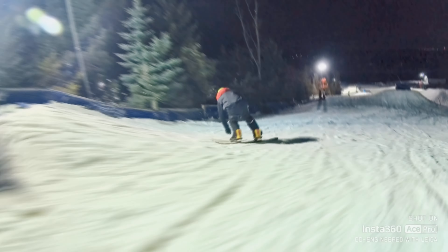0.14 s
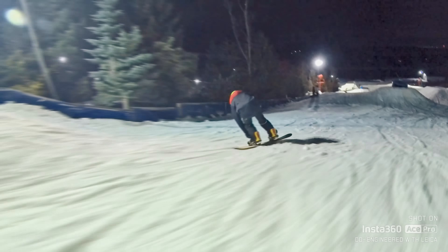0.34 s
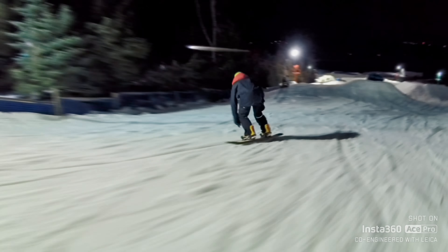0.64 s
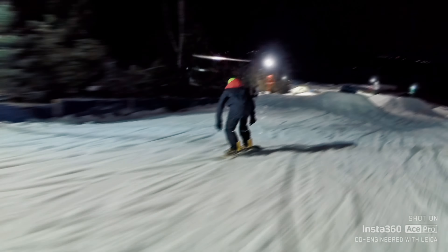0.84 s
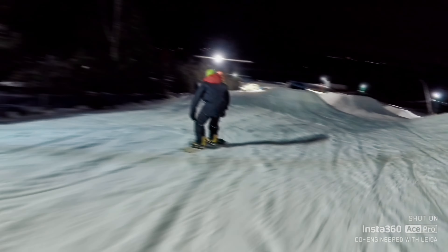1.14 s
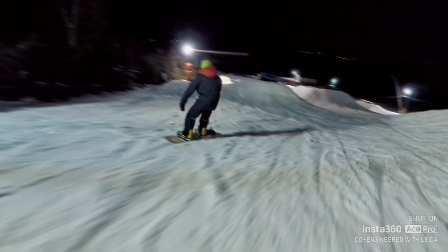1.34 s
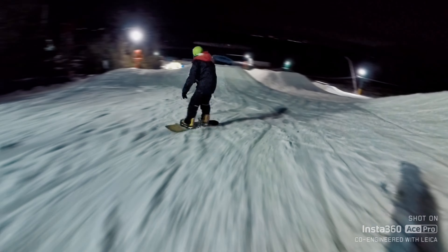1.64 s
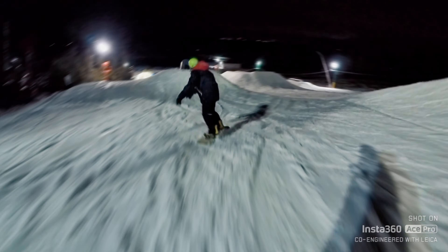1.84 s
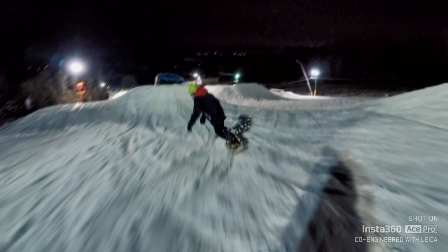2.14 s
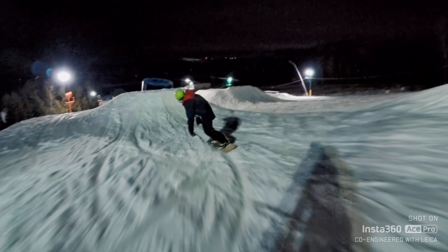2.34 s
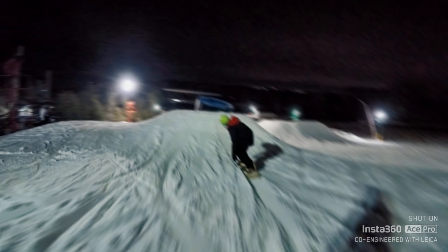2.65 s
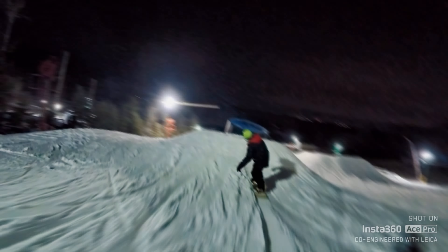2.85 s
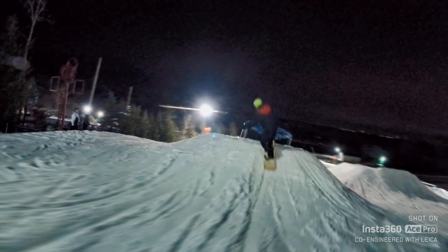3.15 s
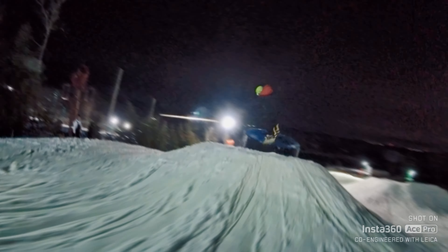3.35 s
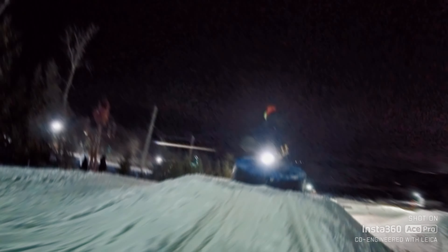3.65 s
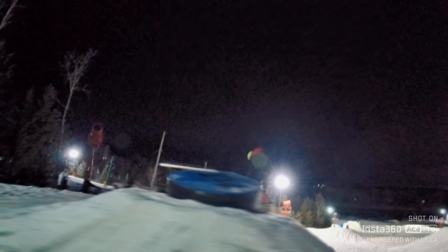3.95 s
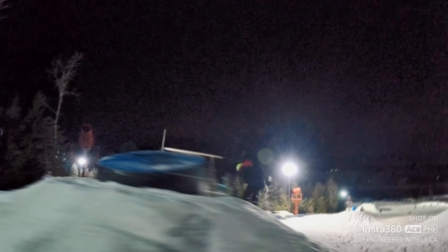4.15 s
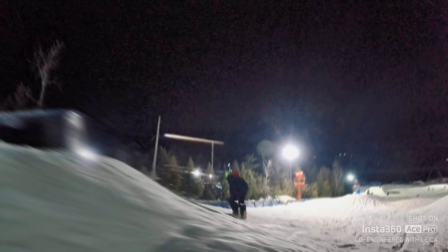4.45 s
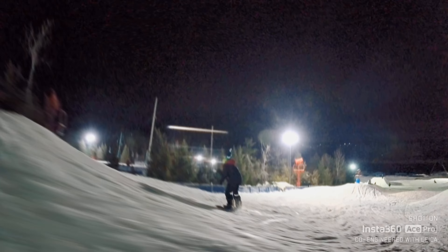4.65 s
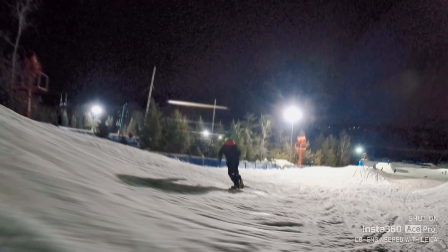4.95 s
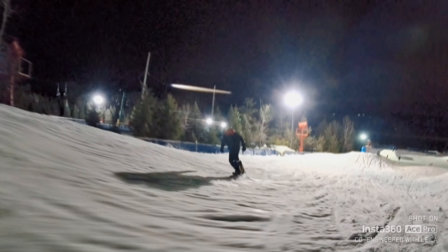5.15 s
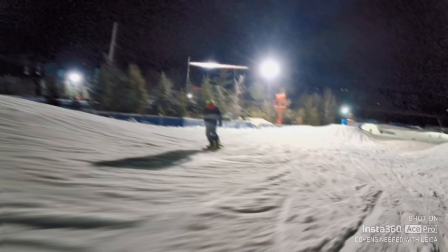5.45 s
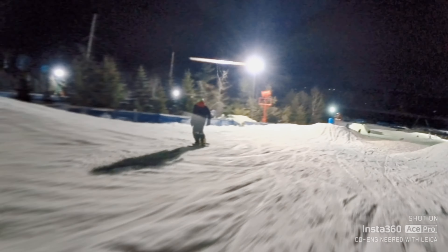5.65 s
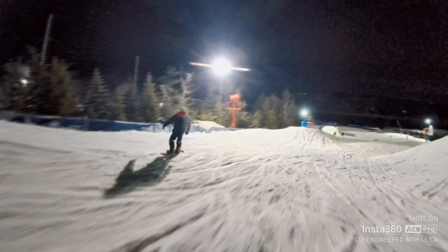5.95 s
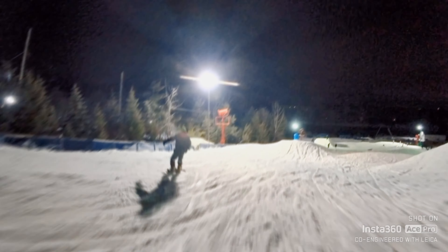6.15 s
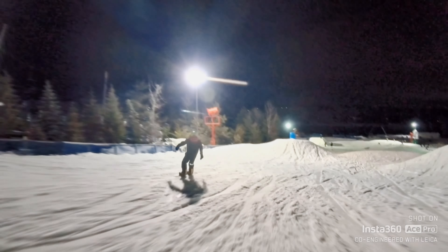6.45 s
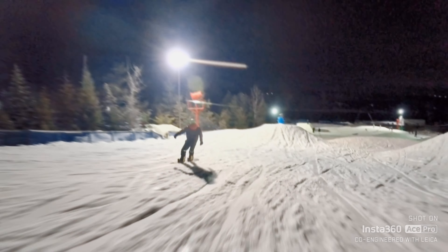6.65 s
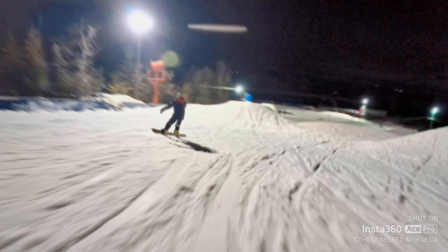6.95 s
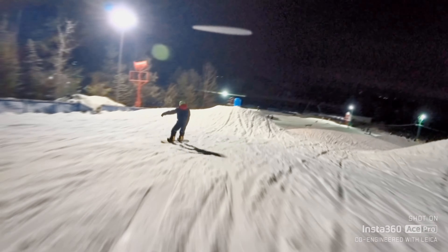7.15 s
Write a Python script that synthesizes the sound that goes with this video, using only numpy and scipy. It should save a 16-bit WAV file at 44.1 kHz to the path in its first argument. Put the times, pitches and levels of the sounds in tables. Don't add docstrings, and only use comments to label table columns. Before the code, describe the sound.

Outdoors on a night slope, a moving camera microphone is battered by wind: deep rumble, tearing gusts and blunt pops. A snowboard edge hisses and scrapes beneath, catching icy lumps. Halfway the board smacks a hollow barrel, leaving a low hum for about a second. Carving then grows clearer and crunchier before heavy gusts return at the end.

```python
import sys
import numpy as np
from scipy import signal
from scipy.fft import rfft, irfft, next_fast_len
from scipy.io import wavfile
from scipy.ndimage import uniform_filter1d, minimum_filter1d, map_coordinates

SR = 44100
rng = np.random.default_rng(int(sys.argv[2]) if len(sys.argv) > 2 else 0)


def unload_wav(signal):
    wavfile.write(
        sys.argv[1],
        SR,
        np.round(np.clip(np.atleast_2d(signal).T, -1, 1) * 32767).astype(np.int16),
    )


def undo_db(level):
    steps = np.asarray(level, float) / 20
    return 10 ** steps


N = 321487


def unit(x):
    return x / np.sqrt(np.mean(x ** 2) + 1e-20)


def curves(rows):
    s, *columns = np.transpose(rows)
    return [np.interp(np.arange(N) / SR, s, column) for column in columns]


def wobble(rate):
    knots = rng.standard_normal(int(N * rate / SR) + 4)
    return map_coordinates(knots, [np.arange(N) * rate / SR])


def held(s, length, attack, release):
    t = np.arange(N) / SR - s
    return np.clip(np.minimum(t / attack, 1 + (length - t) / release), 0, 1)


def filtered(x, response):
    m = next_fast_len(N + 8192)
    return irfft(rfft(x, m) * response(np.fft.rfftfreq(m, 1 / SR)), m)[..., :N]


def coloured(x, spectrum):
    f, db = np.transpose(spectrum)
    return unit(filtered(x, lambda hz: undo_db(np.interp(np.log(hz + 1), np.log(f), db))))


def spread(mid, side, pan_db):
    return np.array([(mid + side) * undo_db(pan_db / 2), (mid - side) * undo_db(-pan_db / 2)])


def eddies(count, lump_db, spikes, spike_db):
    size = undo_db(spike_db * np.minimum(rng.standard_exponential((count, N)), 2.5))
    sign = np.where(rng.random((count, N)) < .7, 1, -1)
    struck = rng.random((count, N)) < spikes / SR
    noise = undo_db(lump_db * wobble(40)) * rng.standard_normal((count, N))
    return noise, unit(sign * size * struck)


# t/s, level/dB, how squarely it strikes the ports/dB
AIR_STREAM = [(0, -28, 5), (.3, -31.5, 4.5), (.87, -31, 2), (1.2, -29, 0), (1.45, -25, 4),
              (1.8, -24.5, 8.5), (1.92, -34, -3), (2.2, -23.5, 6.5), (2.65, -28, 4.5), (2.95, -22.5, -9),
              (3.25, -33.5, 2.5), (3.5, -26, 2.5), (3.75, -34.5, 8), (4.1, -26.5, 2.5), (5.1, -25.5, 0),
              (5.6, -28, -5), (6.8, -21.5, -12), (7.29, -36, 14.5)]
# t/s, peak level/dB, throb over deep rumble/dB
LARGE_EDDIES = [(.57, -20.5, 0.5), (1.05, -23, 2), (1.3, -12.5, -36), (1.445, -22.5, 14), (1.54, -17, 7),
                (1.7, -13.5, 0), (1.83, -22, -5), (2.13, -23, -9), (2.7, -12.5, 5), (3.04, -26.5, 10.5),
                (3.342, -15.5, 0.5), (3.47, -13.5, 3), (3.96, -19, 9.5), (4.39, -31, 5),
                (4.53, -35.5, 20.5), (4.59, -25, 6), (5.04, -18.5, 0.5), (5.24, -19, -4), (5.34, -21, 0),
                (5.75, -21, -9), (6.09, -21, -1), (6.15, -37, 14), (6.33, -20, -22), (6.52, -22, -13),
                (6.94, -20.5, 8), (7.09, -25, 7), (7.29, -12, -4)]
# t/s, length/s
LULLS = [
    (0.52, 0.02),
    (1.467, 0.031),
    (2.213, 0.013),
    (2.574, 0.017),
    (3.52, 0.025),
    (4.627, 0.028),
    (5.263, 0.057),
]
# f/Hz, level/dB per Hz
DEEP_SPECTRUM = [(14, -44), (26, -7), (40, 6), (60, 7), (85, 0), (120, -8), (180, -90)]
# f/Hz, level/dB per Hz
THROB_SPECTRUM = [(40, -35), (70, -0.5), (110, -2), (150, -2.5), (210, -12), (320, -23.5), (600, -61)]


def rumble():
    air_db, square_db = curves(AIR_STREAM)
    deep, throb = undo_db(air_db + 0.5), undo_db(air_db + square_db)
    t = np.arange(N) / SR
    for s, db, throb_db in LARGE_EDDIES:
        swell = undo_db(db - 3 - 233 * np.abs(t - s))
        deep = deep + swell
        throb = throb + undo_db(throb_db) * swell
    edge_s = 0.0068
    lull = undo_db(-9.5 * sum(held(s, length, edge_s, edge_s) for s, length in LULLS))
    deep, throb = lull * deep, lull * throb
    both = undo_db(-5) * rng.standard_normal(N)
    ports = np.array([coloured(both + undo_db(7.4 * wobble(5)) * rng.standard_normal(N), DEEP_SPECTRUM) for _ in "LR"])
    mid, side = throb * coloured(undo_db(3.1 * wobble(25)) * rng.standard_normal((2, N)), THROB_SPECTRUM)
    return undo_db(4.5) * deep * ports + spread(mid, undo_db(-24) * side, 2.04)


# t/s, length/s, roar level/dB, tearing over roar/dB
GUSTS = [(0, 0.22, -31, 9.5), (0, 0.49, -24, 7), (0.529, 0.06, -28.5, 1.5), (1.42, 0.031, -30, 0),
         (1.498, 0.31, -26.5, -27), (1.512, 0.41, -23, -5), (1.84, 0.37, -24.5, -0.5),
         (2.096, 0.11, -25.5, 5), (2.242, 0.15, -21, -1.5), (2.302, 0.058, -25.5, 2),
         (2.4, 0.043, -16.5, -7.5), (2.452, 0.049, -17, -4.5), (2.504, 0.067, -22.5, -5.5),
         (2.594, 0.038, -15.5, -11), (2.651, 0.07, -16, -27), (3.015, 0.062, -33, -42),
         (3.299, 0.12, -31.5, -32), (3.462, 0.049, -21.5, -15), (0.624, .05, -36, -2),
         (3.916, 0.063, -15.5, -16.5), (3.997, 0.054, -20.5, -12.5), (4.043, 0.06, -29.5, -20),
         (4.38, 0.034, -26, -30), (4.487, 0.098, -22.5, -13), (4.802, .095, -32, 3), (5, 0.18, -37, 1),
         (6.9, 0.083, -16, -20), (6.972, 0.1, -20, -17), (7.104, 0.072, -19.5, -10.5),
         (7.202, .09, -17, -16)]
# t/s, peak level/dB, brightness/dB, pulse f/Hz
POPS = [(.365, -12, 20, 592), (.412, 1, 6, 1100), (.574, -4, -14, 600), (1.446, -1, -21, 252),
        (1.506, 5, -10, 263), (1.6, -5, -2, 390), (7.0857, 5, -9, 240), (1.748, -4.5, -1, 417),
        (1.811, -6, 3, 471), (7.187, 3, -16.5, 328), (2.251, -5, -15, 680), (2.463, 5, -2, 546),
        (2.564, 7, -24, 373), (2.613, -7, -6.5, 261), (7.215, -17, -5, 369), (3.465, 16, -16.5, 650),
        (3.487, -7.5, 0, 505), (3.979, -13, -3, 288), (4.017, 2, -19, 610), (4.335, -5.5, -12, 633),
        (4.492, -2, -16, 358), (4.547, 0.5, -15, 263), (4.823, -2.5, -16, 880), (7.238, -4.5, -8, 500),
        (4.88, 3.5, -10, 1020), (6.908, -3, -13, 299), (6.929, -1.5, -7, 415), (7.009, -5, -19, 264),
        (7.158, 10, -16, 402), (7.273, -6, -5, 439)]
# t/s, peak level/dB
PUFFS = [(0.234, -25), (0.548, -20), (1.574, -10), (1.587, -11), (1.675, 1), (1.738, -2), (1.769, -12),
         (2.138, -5), (2.169, -5), (2.408, -20), (2.431, 5), (2.681, -13), (2.699, -1.5), (2.744, -12),
         (3.808, -11.5), (3.917, -29), (3.941, -7), (4.037, -11), (4.082, -14.5), (4.215, -13), (4.407, -5),
         (4.808, -12), (5.108, -12.5), (6.991, -6), (1.65, -17), (2.101, -14), (7.107, -12), (4.851, -10),
         (3.023, -9.5), (0.663, -12)]
# f/Hz, level/dB per Hz
ROAR_SPECTRUM = [(80, -47), (150, 3), (220, 4), (350, -0.5), (550, -5), (800, -13), (1300, -23),
                 (2500, -48)]
# f/Hz, level/dB per Hz
TEAR_SPECTRUM = [(300, -9), (600, 1.5), (900, 1.5), (1500, 1.5), (2200, -4), (3000, -11), (4200, -23.5),
                 (7000, -44)]


def gusts():
    roar, tear, kicks = np.full(N + SR, 1e-9), np.zeros(N + SR), np.zeros(N + SR)
    for s, length, db, bright_db in GUSTS:
        blow = undo_db(db) * held(s, length, attack=0.004, release=0.015)
        roar[:N] += blow
        tear[:N] += undo_db(bright_db) * blow
    t = np.arange(SR // 16) / SR
    wake = (1 - np.exp(-t / 0.00065)) * np.exp(-(t / 0.005) ** 2)
    bursts = [(*pop, -3) for pop in POPS]
    bursts += [(*puff, -11, 295, -5) for puff in PUFFS]  # brightness/dB, f/Hz, push/dB
    for s, db, bright_db, hz, push_db in bursts:
        now = slice(round(s * SR), round(s * SR) + len(t))
        u = np.pi * hz * t - 1.6
        kicks[now] += undo_db(db + push_db) * (1 - 1.65 * u ** 2) * np.exp(-u ** 2)
        roar[now] += undo_db(db - 13.5) * wake
        tear[now] += undo_db(db + bright_db - 0.5) * wake
    noise, spikes = eddies(count=2, lump_db=1.6, spikes=450, spike_db=5)
    ragged = unit(undo_db(2.6 * wobble(170) + 2.4 * wobble(70)))
    roar = uniform_filter1d(roar[:N], size=60)
    tear = ragged * uniform_filter1d(tear[:N], size=20)
    small = np.clip(1.1 * uniform_filter1d(tear, size=400) / uniform_filter1d(roar, size=400), 0, 1)
    drive = noise + 1.1 * spikes
    dull = coloured(drive, [(0.6 * hz, db) for hz, db in TEAR_SPECTRUM])
    tearing = small * coloured(drive, TEAR_SPECTRUM) + 1.24 * (1 - small) * dull
    mid, side = roar * coloured(noise + .9 * spikes, ROAR_SPECTRUM) + tear * tearing
    return spread(mid + kicks[:N], undo_db(-33) * side, 2.35)


# f/Hz, level/dB per Hz
HISS_SPECTRUM = [(710, -7.5), (1200, -16.5), (1500, 0), (1730, -4.5), (2160, -3), (2540, -5), (3010, -3),
                 (7250, -5.5), (9990, -10), (12200, -21), (14100, -22), (15500, -37)]


def hiss(hiss_db):
    z = signal.stft(rng.standard_normal((2, N)), nperseg=512)[2]
    patches = uniform_filter1d(rng.standard_normal(z.shape[1:]), 14, 0)
    patches = uniform_filter1d(patches, 9, 1)
    pair = signal.istft(z * undo_db(0.82 * unit(patches)), nperseg=512)[1][:, :N]
    return coloured(pair, HISS_SPECTRUM) * undo_db(hiss_db + 1.5 + 0.6 * wobble(16) + 0.6 * wobble(60))


# t/s, edge pressure level/dB, lean into the carve/dB
RIDE = [(0, -29.5, 11.5), (.3, -35, -15), (.59, -36, 4), (.68, -31.5, 3), (.89, -28.5, 5),
        (1.3, -27.5, 5.5), (1.42, -29.5, 11.5), (1.55, -35, 2), (1.91, -40, 15), (2.41, -41.5, -7),
        (2.87, -31.5, -1.5), (3.5, -34, -4), (3.9, -39, -2), (4.2, -39, 0), (4.7, -32.5, 6.5),
        (5.7, -27, 2), (6.9, -27, 0.5), (7.29, -34, 4)]
# t/s, length/s, loss/dB
SKIPS = [(1.429, 0.024, 8), (2.928, 0.14, 3.5), (3.703, 0.079, 5), (4.113, 0.089, 4.5), (6.058, 0.053, 3),
         (6.48, 0.1, 5.5), (6.902, 0.19, 3), (7.164, .03, 10), (.1, 0.14, -1), (1.222, 0.15, -3.5),
         (2.2, 0.078, -3.5), (3.233, 0.14, -1), (5.43, 0.14, -2), (5.665, 0.088, -3), (6.608, 0.033, -2)]
# t/s, left over right level/dB
HEADING = [(0, 1), (1.3, 2.5), (2, -0.5), (3, 2), (4.5, 2), (5.5, 2), (6.7, 4), (7.1, 1.5)]
# f/Hz, level/dB per Hz
SCRAPE_SPECTRUM = [(130, -7), (220, -3), (500, -6.5), (900, -2), (1400, -1.5), (2200, -2.5), (4500, -47)]
# f/Hz, level/dB per Hz
GRIT_SPECTRUM = [(900, -38), (1450, -41), (1750, -4), (2200, 10), (2700, 10), (3300, 12.5), (5000, -29)]


def snow():
    (hiss_db, scrape_db), (pan_db,) = curves(RIDE), curves(HEADING)
    hiss_db = hiss_db - sum(db * held(s, length, attack=0.015, release=0.009) for s, length, db in SKIPS)
    noise, crunch = eddies(count=2, lump_db=1.36, spikes=480, spike_db=11)
    scrape_db = -37 + .6 * (hiss_db + 32) + np.maximum(scrape_db, -4)
    scrape = coloured(noise, SCRAPE_SPECTRUM) * undo_db(scrape_db)
    grit = coloured(undo_db(2.5 * wobble(30)) * (crunch + noise), GRIT_SPECTRUM) * undo_db(hiss_db - 8)
    mid, side = hiss(hiss_db) + scrape + grit
    return spread(mid + lumps(crunch[1] + .5 * noise[1]), undo_db(-20) * side, pan_db)


# t/s, peak level/dB, f/Hz
ICY_LUMPS = [(.7183, -7, 1410), (.8645, 1.5, 2380), (1.2206, -6, 1610), (1.3254, 2, 2290), (5.33, -7, 2100),
             (5.477, -2, 2140), (5.572, -0.5, 2090), (5.741, -26, 2790), (5.789, -8, 1460),
             (5.925, -19, 2160), (5.959, -9, 2280), (6.132, 1, 2220), (6.263, -2, 2170), (6.336, -4, 2260),
             (6.449, -2, 2320), (6.495, -27, 1470), (6.593, -8, 2180), (6.706, -3, 2570), (6.799, -1, 990),
             (6.882, 0, 1960)]
# f/Hz, level/dB per Hz
EDGE_SPECTRUM = [(1200, -40), (1900, -3), (2150, 3), (2450, -6), (3600, -38)]


def lumps(drive):
    t, rings = np.arange(SR // 40) / SR, np.zeros(N + SR)
    for s, db, hz in ICY_LUMPS:
        envelope = undo_db(db - 3 - 60 * t / .008) * (1 - np.exp(-t / .0006))
        rings[round(s * SR):][:len(t)] += envelope * np.sin(2 * np.pi * hz * t)
    trail = sum(undo_db(db / 3 - 29) * held(s, 0.0056, attack=.003, release=0.057) for s, db, hz in ICY_LUMPS)
    return rings[:N] + trail * coloured(drive, EDGE_SPECTRUM)


# t/s, peak level/dB, t60/s
SLAPS = [
    (3.5406, -1.5, 0.016),
    (4.213, -24, 0.056),
]
# f/Hz, width/Hz, level/dB
BOARD_MODES = [(427, 290, 0.5), (1670, 890, -0.5), (2800, 600, -1.5), (3780, 730, -4.5), (4980, 830, -9)]


def slaps():
    blows, t = np.zeros(N + SR), np.arange(SR // 4) / SR
    for s, db, t60 in SLAPS:
        burst = undo_db(-18 - 60 * t / t60) + undo_db(-17 - 60 * t / (8 * t60))
        blows[round(s * SR):][:len(t)] += undo_db(db + 12) * burst * rng.standard_normal(len(t))
        blows[round(s * SR)] += undo_db(db + 18)

    def board(f):
        total = 0
        for k, (centre, width, db) in enumerate(BOARD_MODES):
            damping = 1j * f * width
            total = total + (-1) ** k * undo_db(db) * damping / (centre ** 2 - f ** 2 + damping)
        return total / (1 + 1j * f / 9000) ** 2

    return spread(filtered(blows[:N], board), 0, 0.93)


# f/Hz, peak level/dB, t60/s
BARREL_MODES = [(76.6, -20, 2.5), (107, -18.5, 7.5), (139, -38, 1.4), (200, -44, 1), (257, -34, 2.5)]


def barrel():
    t = np.maximum(np.arange(N) / SR - SLAPS[0][0], 0)
    hum = 0
    for hz, db, t60 in BARREL_MODES:
        hum = hum + undo_db(db - 60 * t / t60 + 0.79 * wobble(17)) * np.sin(2 * np.pi * hz * t)
    onset = 1 - np.exp(-t / 0.0081)
    left_behind = 1 + (t / 0.87) ** 12
    return spread(hum * onset / left_behind, 0, 1.1)


def scene():
    return rumble() + gusts() + snow() + slaps() + barrel()


def top_cut(x):
    return signal.sosfilt(signal.butter(12, 15650, fs=SR, output="sos"), x)


def record(dry):
    need = np.minimum(1, .9 / (np.abs(dry).max(0) + 1e-9))
    left, right = dry * uniform_filter1d(minimum_filter1d(need, size=121), size=121)
    hz, _, (mid, side) = signal.stft(np.array([left + right, left - right]) / 2, SR, nperseg=2048)
    loudness = uniform_filter1d(np.abs(mid), size=24, axis=0)
    step = undo_db(-18.5) * loudness ** 0.72 * np.mean(loudness[8:200], axis=0) ** 0.31
    chance = np.repeat(rng.standard_normal((65, side.shape[1])), 16, axis=0)[:len(hz)]
    chance = uniform_filter1d(chance, size=3, axis=1)
    band = uniform_filter1d(uniform_filter1d(np.abs(side), size=16, axis=0), size=3, axis=1)
    audible = band > loudness * undo_db(-19.5 + 4 * unit(chance))
    kept = (np.abs(side) > step) & audible
    side = side * (kept | (hz[:, None] < 200))
    pair = np.array([mid, side]) * (hz[:, None] < 15500)
    mid, side = signal.istft(pair, SR, nperseg=2048)[1][:, :N]
    return top_cut(np.array([mid + side, mid - side]))


dry = scene()
out = record(dry)
unload_wav(out)
```